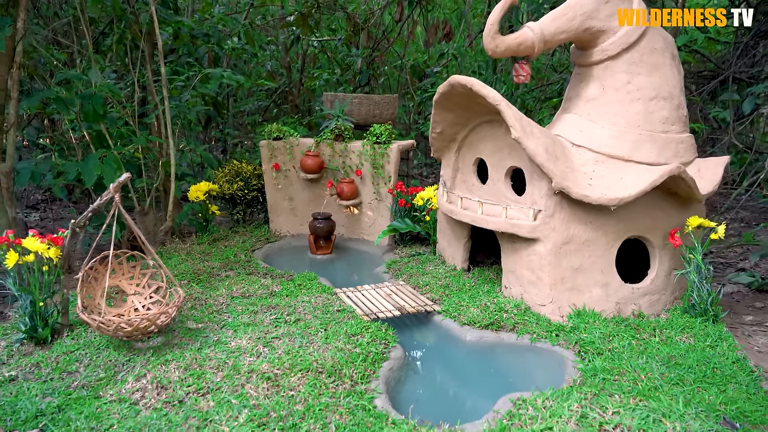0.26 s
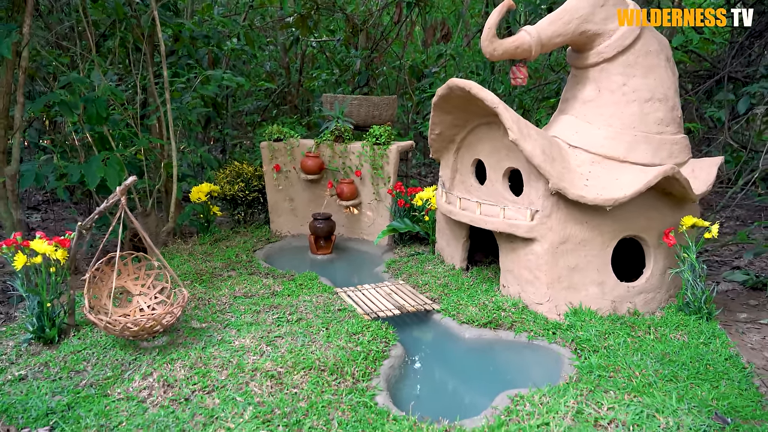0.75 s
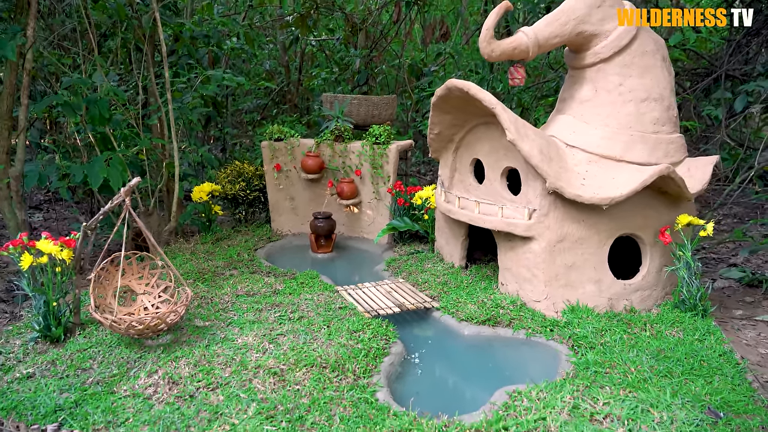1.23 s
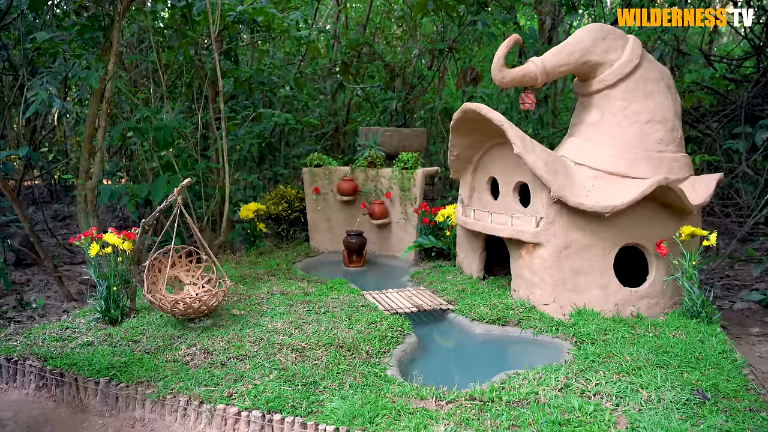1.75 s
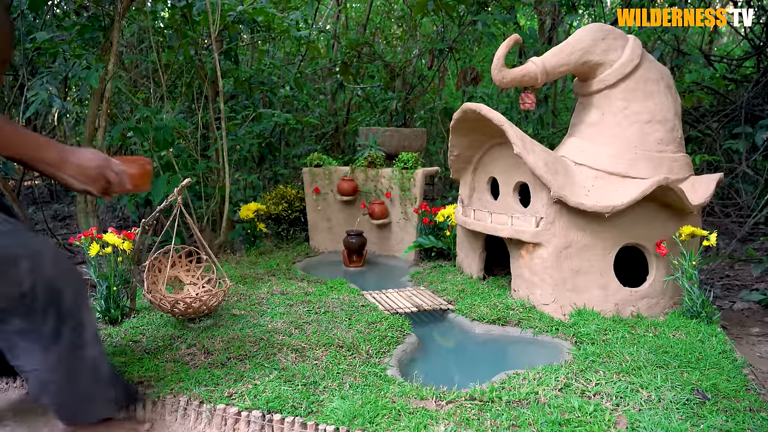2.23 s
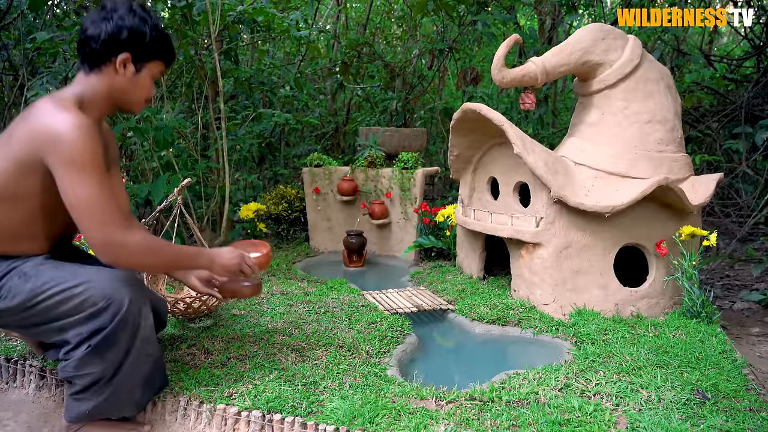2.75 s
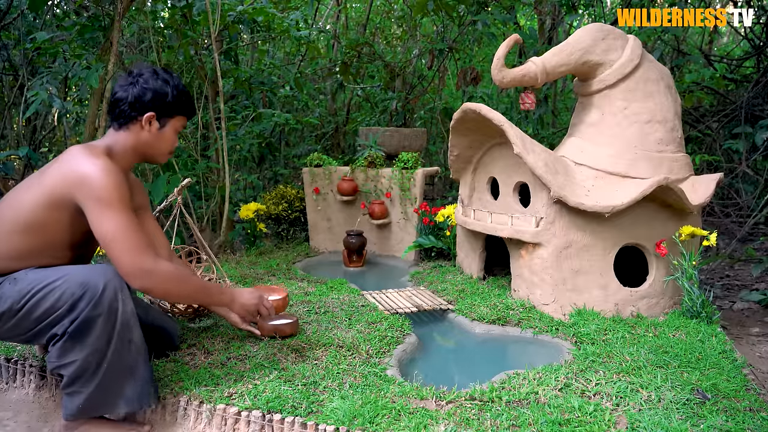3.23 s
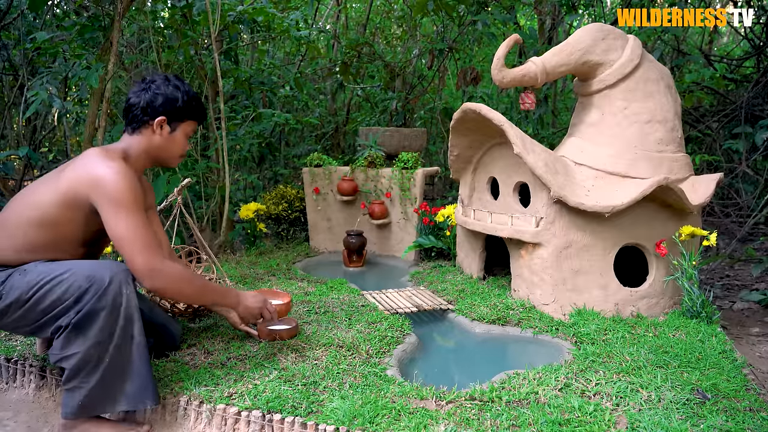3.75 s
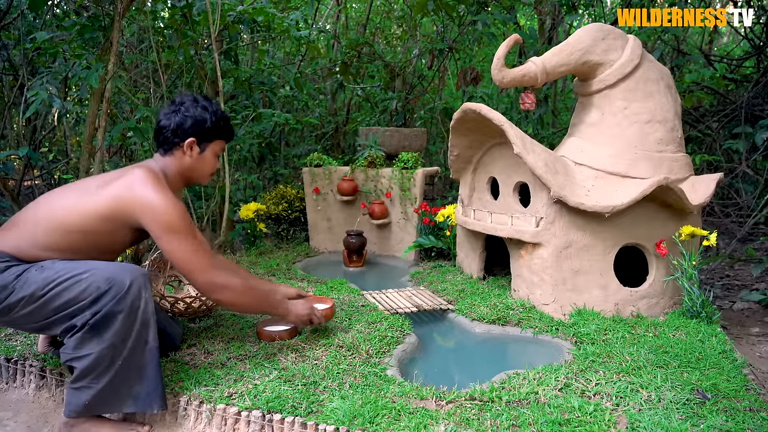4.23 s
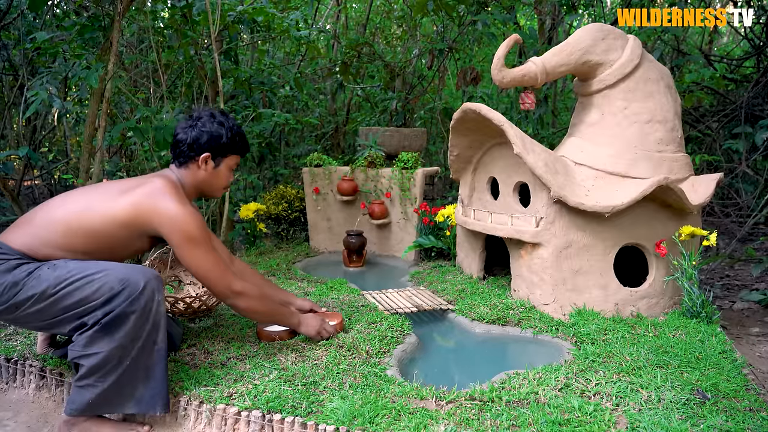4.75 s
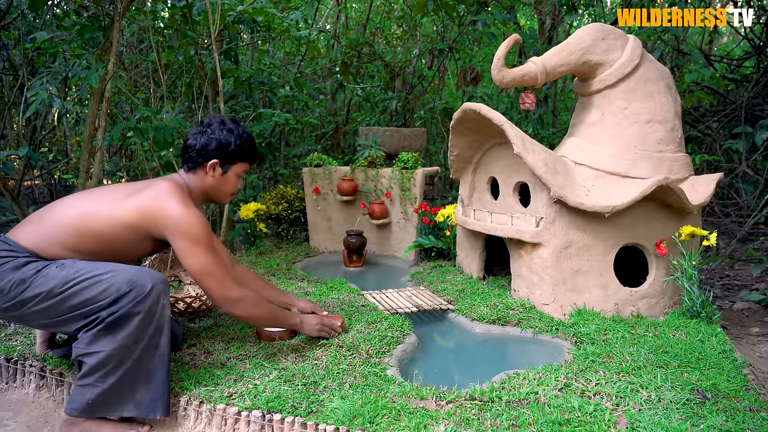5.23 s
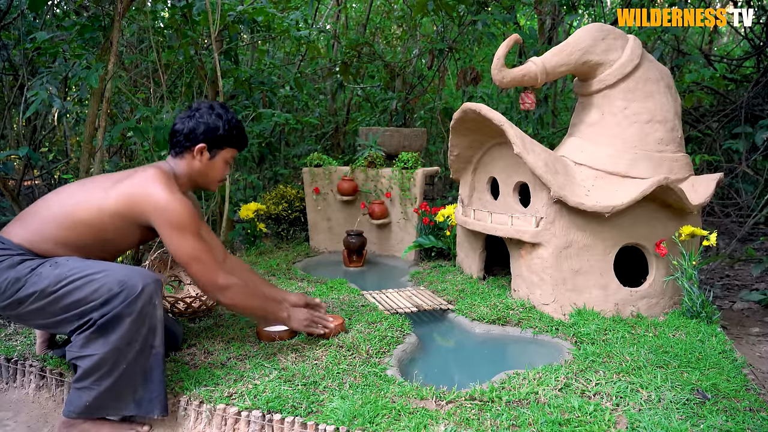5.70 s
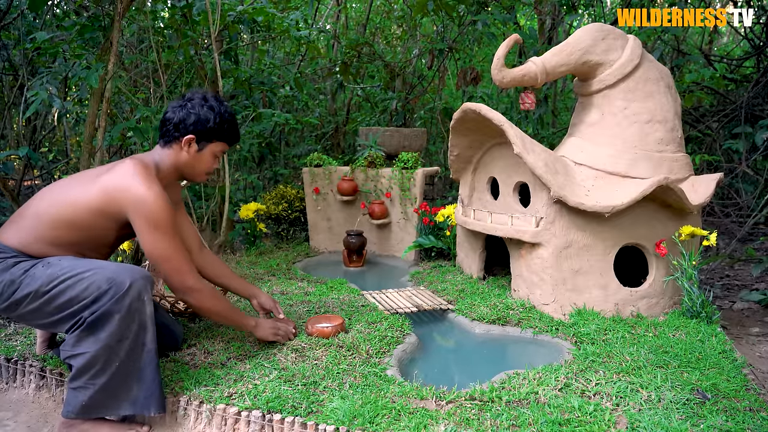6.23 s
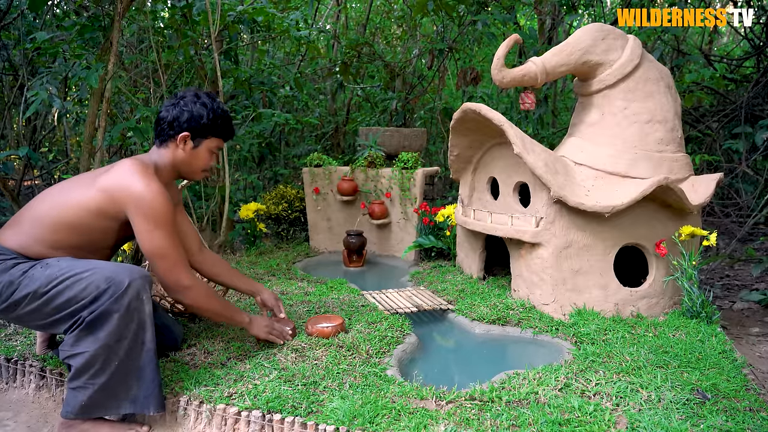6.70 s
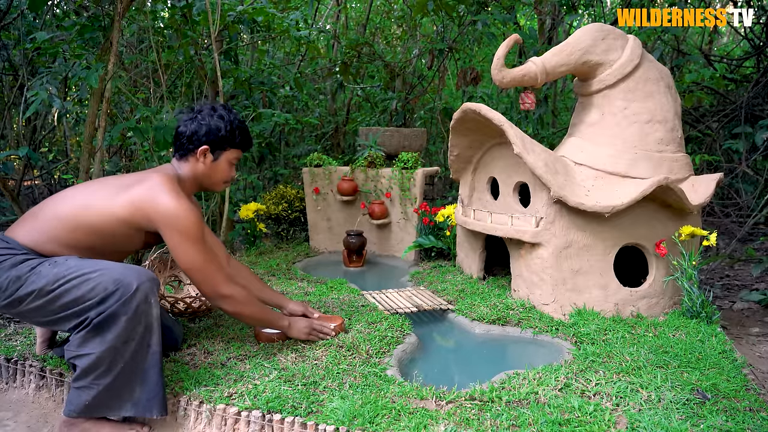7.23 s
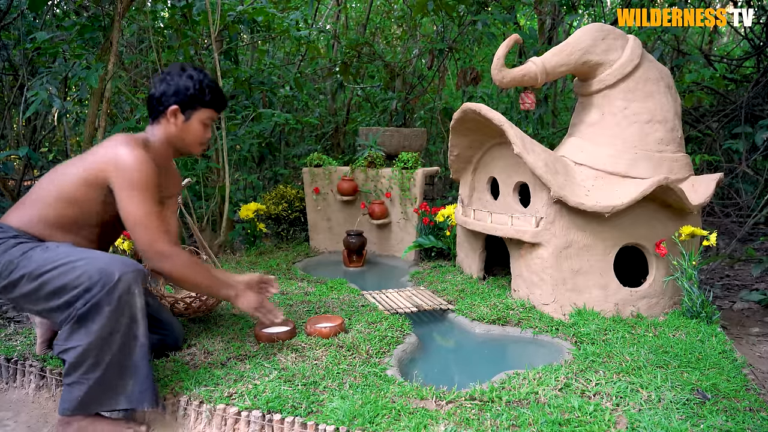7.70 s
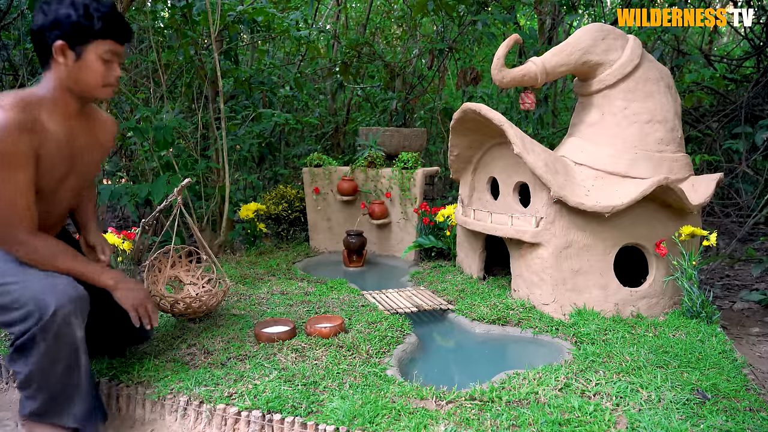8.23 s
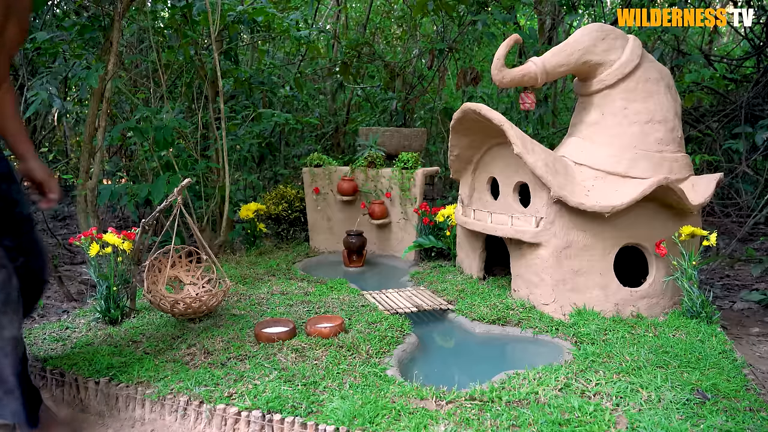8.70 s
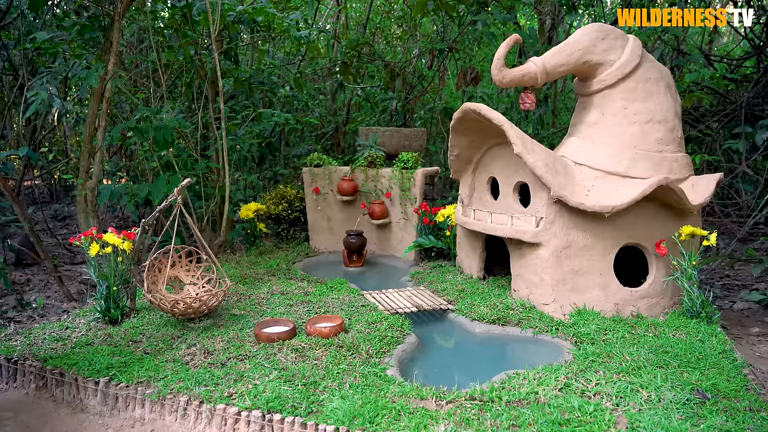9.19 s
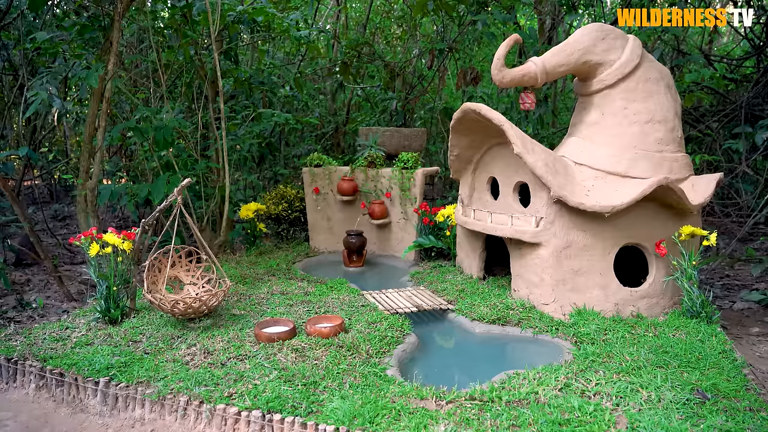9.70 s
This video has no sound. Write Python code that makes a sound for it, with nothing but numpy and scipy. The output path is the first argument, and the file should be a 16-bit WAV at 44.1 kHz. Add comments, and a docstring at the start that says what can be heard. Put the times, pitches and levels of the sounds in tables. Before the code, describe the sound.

Thin streams of water gurgle and plink into a clay pot and shallow pond outdoors, with faint birds and a distant engine swelling.

```python
"""Garden fountain and clay pot

Thin streams of water fall from a garden fountain into a clay pot and a shallow pond.
Trapped air gulps and gurgles as ringing tones; small bubbles plink and short bursts of noise patter.
Far birds whistle in gliding tones, over a hiss of filtered noise and a distant engine of steady
tones and rumble that grows for most of the scene."""
import sys
import numpy as np
from scipy import signal
from scipy.fft import rfft, irfft, next_fast_len
from scipy.io import wavfile
from scipy.ndimage import map_coordinates

SR = 44100
rng = np.random.default_rng(int(sys.argv[2]) if len(sys.argv) > 2 else 0)


def dump_mix(stems):
    """Bounce the given channels to the path in sys.argv[1] as a 16-bit WAV at rate SR."""
    frames = np.atleast_2d(stems).T  # one column per channel
    limited = np.clip(frames, -1, 1)  # hard clip at full scale
    pcm = np.round(limited * 32767).astype(np.int16)
    wavfile.write(sys.argv[1], SR, pcm)


N = 438794  # samples in the scene

# The larger bubbles in the pot, before trims of level and pitch bends:
# [t/s, peak level/dB, f/Hz, life/s]
LARGE_BUBBLES = [(0.033, -31.5, 727, 0.0029), (0.193, -36.5, 760, 0.017), (0.2566, -31.5, 678, 0.014),
                 (0.3394, -31.5, 753, 0.0092), (0.4321, -29.5, 764, 0.011), (0.6035, -29, 880, 0.0087),
                 (0.617, -32, 930, 0.005), (0.742, -37.5, 520, 0.0075), (0.7724, -33, 809, 0.0045),
                 (0.83, -32, 688, 0.01), (0.8623, -29.5, 734, 0.0073), (0.955, -35, 751, 0.01),
                 (0.9865, -20, 744, 0.006), (1.0408, -29.5, 734, 0.0086), (1.311, -25, 746, 0.006),
                 (1.49, -34.5, 662, 0.017), (1.5235, -34, 1224, 0.0073), (1.548, -30, 477, 0.0088),
                 (1.5803, -35, 525, 0.0085), (1.684, -26, 702, 0.0066), (1.758, -30.5, 748, 0.013),
                 (1.78, -30.5, 1090, 0.0041), (1.8909, -31, 755, 0.014), (2.032, -34, 490, 0.015),
                 (2.111, -33, 813, 0.006), (2.16, -36, 757, 0.009), (2.2, -25, 753, 0.011),
                 (2.219, -26.5, 930, 0.0064), (2.3245, -33, 760, 0.0033), (2.34, -34, 750, 0.022),
                 (2.4545, -20.5, 910, 0.0092), (2.512, -31.5, 750, 0.006), (2.778, -38, 934, 0.01),
                 (2.832, -28.5, 638, 0.0045), (2.978, -27, 1250, 0.0078), (2.9996, -31.5, 645, 0.0069),
                 (3.055, -37, 695, 0.0089), (3.121, -33.5, 824, 0.0028), (3.217, -38.5, 538, 0.01),
                 (3.239, -32.5, 549, 0.011), (3.294, -34.5, 1283, 0.011), (3.4635, -33, 608, 0.0075),
                 (3.58, -36, 743, 0.022), (3.6515, -32.5, 767, 0.021), (3.744, -40, 524, 0.017),
                 (3.789, -33.5, 784, 0.015), (3.837, -32, 770, 0.017), (3.865, -27.0, 770, 0.014),
                 (3.9056, -33.5, 727, 0.0079), (3.999, -32.5, 726, 0.012), (4.077, -33.5, 706, 0.012),
                 (4.124, -28.5, 730, 0.01), (4.274, -25.5, 627, 0.0067), (4.375, -33, 690, 0.0071),
                 (4.593, -34, 980, 0.0081), (4.697, -33.5, 1020, 0.006), (4.778, -34, 589, 0.016),
                 (5.0032, -32, 586, 0.012), (5.122, -29.5, 652, 0.005), (5.1825, -38, 503, 0.011),
                 (5.215, -31.5, 570, 0.0068), (5.2576, -37, 660, 0.0082), (5.4254, -25.5, 723, 0.0059),
                 (5.5896, -27, 686, 0.0057), (5.616, -33, 743, 0.019), (5.657, -32.5, 840, 0.004),
                 (5.68, -35, 1014, 0.0077), (5.7008, -34.5, 793, 0.017), (5.719, -34.5, 723, 0.0075),
                 (5.755, -31, 655, 0.0056), (5.8855, -27.5, 626, 0.0093), (5.901, -30, 640, 0.007),
                 (6.096, -30, 698, 0.0055), (6.11, -37, 900, 0.014), (6.275, -32.5, 600, 0.01),
                 (6.325, -28, 661, 0.0094), (6.3433, -37, 690, 0.0095), (6.377, -29.5, 614, 0.012),
                 (6.5485, -31.5, 784, 0.018), (6.6127, -25.5, 745, 0.01), (6.6369, -31, 690, 0.0073),
                 (6.691, -36.5, 656, 0.019), (6.7597, -30.5, 696, 0.0087), (6.877, -23, 784, 0.011),
                 (6.897, -34.5, 778, 0.025), (6.928, -29, 728, 0.0093), (7.0696, -28, 682, 0.0053),
                 (7.092, -32.5, 575, 0.014), (7.116, -36.5, 777, 0.012), (7.246, -39, 597, 0.013),
                 (7.446, -37, 628, 0.014), (7.524, -30.5, 684, 0.0058), (7.592, -30, 636, 0.0089),
                 (7.675, -38, 593, 0.015), (7.705, -38.5, 682, 0.017), (7.7475, -30, 710, 0.0073),
                 (7.796, -28, 660, 0.0062), (7.863, -35.0, 653, 0.012), (7.959, -33.5, 754, 0.009),
                 (7.982, -29.5, 1043, 0.011), (8.285, -26, 755, 0.0087), (8.325, -29.5, 776, 0.011),
                 (8.36, -36, 766, 0.016), (8.408, -34.5, 620, 0.014), (8.6337, -30, 700, 0.0044),
                 (8.689, -34, 590, 0.0095), (8.733, -34, 587, 0.016), (8.7475, -34, 590, 0.022),
                 (9.0622, -19, 777, 0.0089), (9.08, -35, 740, 0.015), (9.171, -36.5, 567, 0.011),
                 (9.199, -36.5, 940, 0.012), (9.2907, -27.5, 706, 0.0049), (9.3724, -27, 690, 0.0099),
                 (9.517, -34, 596, 0.011), (9.565, -37, 620, 0.012), (9.7066, -29, 794, 0.013),
                 (9.784, -30, 707, 0.008)]
# Tone colour of the spray, relative: [f/Hz, level/dB]
SPRAY_COLOUR = [(500, -27), (1500, 8), (2700, -8.5), (4000, -2.5), (7000, 4), (9000, -0.5), (12000, -4),
                (16000, 0.5)]


def amp(db):
    """Turn decibels into a gain."""
    return 10 ** (np.asarray(db) / 20)


def unit(x):
    """Scale to an average strength (rms) of 1."""
    return x / np.sqrt(np.mean(x ** 2) + 1e-20)


def along(points, hz):
    """Read a table of (frequency, value) at any frequency, on a log axis."""
    f, v = np.transpose(points)
    return np.interp(np.log(hz + 1), np.log(f + 1), v)


def curves(rows):
    """Draw one value per sample for each column after the time."""
    s, *columns = np.transpose(rows)
    t = np.arange(N) / SR
    return [np.interp(t, s, column) for column in columns]


def wobble(rate):
    """A smooth random curve through rate random points a second."""
    points = rng.standard_normal(int(N * rate / SR) + 4)
    return map_coordinates(points, [np.arange(N) * rate / SR])


def filtered(x, response):
    """Make each frequency of x louder or softer by response(frequency)."""
    m = next_fast_len(N + SR // 2)
    hz = np.fft.rfftfreq(m, 1 / SR)
    return irfft(rfft(x, m) * response(hz), m)[..., :N]


def stereo_shares(hz):
    """Gains of the shared and the opposed part: near mono in the bass, wide in the treble."""
    # How alike left and right are: [f/Hz, likeness (1 = the same)]
    likeness = [(100, 1), (600, 0.85), (1200, 0.45), (2500, 0.28), (5000, 0.42), (9000, 0.017)]
    turn = np.arccos(np.clip(along(likeness, hz), -1, 1)) / 2
    return np.array([np.cos(turn), np.sin(turn)])


def noise(spectrum):
    """Stereo noise with the given tone colour, scaled to rms 1."""
    def response(hz):
        return amp(along(spectrum, hz)) * stereo_shares(hz)

    mid, side = filtered(rng.standard_normal((2, N)), response)
    return unit(np.array([mid + side, mid - side]))


def echo(x, decay, size, count):
    """Blurred echoes: noise tails in which each frequency dies at its own speed.
    The scene is cut into count stretches, each with its own random tail, as the sources move."""
    hz, t, z = signal.stft(rng.standard_normal((count, 2, size)), SR, nperseg=128)
    fade = amp(-60 * t / along(decay, hz)[:, None])
    z = z * fade * stereo_shares(hz)[:, :, None]
    tails = signal.istft(z, SR, nperseg=128)[1]
    out, hop = np.zeros((2, 2 * N)), N // count + 1
    for k, (mid, side) in enumerate(tails):
        late = np.arange(len(mid)) > SR // 1500  # a short silence before the echo
        tail = np.array([mid + side, mid - side]) * late
        stretch = x[:, k * hop:(k + 1) * hop]
        wet = signal.fftconvolve(stretch, tail / np.linalg.norm(tail[0]), axes=1)
        out[:, k * hop:][:, :wet.shape[1]] += wet
    return out[:, :N]


def bubbles(s, db, hz, life, glide, hold, spread, size, sag=0, linger=0):
    """Stereo sum of bubbles, each a short tone of bending pitch from trapped air.
    glide: pitch rise per life; hold > 1 delays the decay; sag: how far above its pitch
    a bubble starts; linger: share that rings on; spread: left-right unlikeness."""
    t = np.arange(size) / SR
    chance = rng.standard_normal((len(s), 3))
    hz, age = hz[:, None], t / life[:, None]
    # the pitch settles as the bubble pinches off, then on average rises as it nears the surface
    settling = sag * np.exp(-hz * t / 0.6)
    rising = glide * (1 + chance[:, :1]) * (np.minimum(age, 3) - .5)
    phase = 2 * np.pi * np.cumsum(hz * (1 + settling + rising), axis=1) / SR
    onset = 1 - np.exp(-(1.01 * hz * t) ** 2)
    decay = np.exp(-age ** hold) + linger * np.exp(-t / 0.015)
    shape = onset * decay * (1 - (t / t[-1]) ** 4)  # the last factor ends in silence
    shape *= amp(db)[:, None] / (shape.max(axis=1, keepdims=True) + 1e-9)
    # short waves arrive left and right with unlike phase and strength
    apart = spread * np.minimum(hz / 7000, 1.3) ** 0.91
    starts = np.maximum(s * SR, 0).astype(int)
    index = (starts[:, None] + np.arange(size)).ravel()
    channels = []
    for side in (1, -1):
        strength = amp(side * apart * chance[:, 1:2])
        wave = shape * strength * np.sin(phase + side * apart * chance[:, 2:])
        channels.append(np.bincount(index, wave.ravel(), N)[:N])
    return np.array(channels)


def swarm(impacts, count, delay, low_hz, high_hz, cycles, scatter_db, size):
    """Every impact leaves count bubbles of random pitch and strength soon after it; rms 1."""
    s, force_db = np.repeat(impacts, count, axis=0).T
    pitch, strength, length, wait = rng.random((len(s), 4)).T
    hz = np.minimum(low_hz * (high_hz / low_hz) ** pitch, SR / 2.5)
    life = cycles * 2 ** (2 * length - 1) / hz  # from half to twice the usual cycles
    db = force_db + scatter_db * strength ** 2
    s = s - delay * np.log(1 - wait)
    return unit(bubbles(s, db, hz, life, glide=.02, hold=1.4, spread=.9, size=size))


def moments(count):
    """Random times over the whole scene."""
    return rng.uniform(0, N / SR, count)


def landings(count, scatter_db):
    """Lumps of water landing at random with uneven force: (time in s, force in dB)."""
    return np.column_stack([moments(count), scatter_db * rng.random(count) ** 2])


def staggered(count):
    """Times at which a stream breaks into lumps: one at random in each of count equal slots."""
    return (np.arange(count) + rng.random(count)) / count * (N - 1) / SR


def splashes(s, db, fade, spectrum):
    """A burst of noise at each time, dying away with the time constant fade in seconds."""
    entries = np.bincount((s * SR).astype(int), amp(db), N)[:N]
    burst = np.exp(-np.arange(SR // 30) / SR / fade)
    return signal.fftconvolve(entries, burst)[:N] * noise(spectrum)


def wash():
    """The soft hiss of water and leaves: coloured noise that wavers in level."""
    # Relative tone colour: [f/Hz, level/dB]
    hiss_colour = [(200, -37), (350, -8.5), (450, -12), (700, -14), (1100, -1), (1800, -5), (2700, -2),
                   (3800, -3), (6500, -3), (9000, -6), (16000, -11.5)]
    return amp(-55 + 1.76 * wobble(12)) * noise(hiss_colour)


def engine():
    """A far engine: tones at multiples of a wandering turning rate, within low noise."""
    # Rise and fall of the engine, before the rumble's trim: [t/s, hum level/dB, rumble level/dB]
    engine_course = [(0, -79, -73), (1.5, -78, -73.5), (2.5, -74, -72), (4.5, -70.5, -71), (5.5, -68, -70),
                     (7.5, -69.5, -70.5), (8.2, -66.5, -71), (9, -66, -68.5), (9.95, -72, -65.5)]
    # Relative tone colour of the rumble: [f/Hz, level/dB]
    rumble_colour = [(20, -28), (40, -18), (70, -15), (100, -3.5), (150, -2), (200, -5.5), (260, -3.5),
                     (350, -11.5), (600, -44), (1200, -56)]
    # Relative strength of the tones: [multiple of the turning rate, level/dB]
    engine_tones = [(4, -19), (5, -8), (6, -2), (7, -5), (8, -9), (9, -11.5), (10, -11), (11, -18.5)]
    turning_hz, rumble_trim_db = 25.22, 0.5
    hum_db, rumble_db = curves(engine_course)
    turns = np.cumsum(turning_hz * (1 + 0.00608 * wobble(2))) / SR
    hum = 0
    for order, db in engine_tones:
        tone = np.sin(2 * np.pi * (order * turns + rng.random()))
        hum = hum + amp(db + 1.7 * wobble(3)) * tone
    return amp(rumble_db + rumble_trim_db) * noise(rumble_colour) + amp(hum_db) * unit(hum)


def birds():
    """Gliding whistles, some raspy, fluttering in strength and smeared by the trees."""
    # Far whistles, before flutter and mixing:
    # [t/s, length/s, start f/Hz, middle f/Hz, end f/Hz, level/dB, rasp (share of pitch)]
    whistles = [(.105, .21, 4110, 4130, 4020, -52, .011), (.298, .05, 4000, 3700, 3300, -52, .008),
                (.328, .09, 3300, 3180, 3230, -54, .01), (.51, .05, 5200, 5350, 5550, -56.5, .016),
                (.555, .11, 5620, 5640, 5620, -52.5, .014), (.70, .09, 2950, 2820, 2860, -54.5, .055),
                (.92, .11, 2900, 2680, 2580, -54.5, .06), (6.62, .18, 6100, 6380, 6450, -53.5, .022),
                (6.85, .22, 2790, 2840, 2940, -54, .022), (7.11, .15, 3475, 3460, 3445, -49, .007),
                (7.255, .095, 3410, 3450, 3420, -55.5, .012), (7.33, .05, 3420, 3230, 2780, -50.5, .008),
                (7.99, .52, 5900, 6200, 6300, -56.5, .06), (8.95, .11, 3600, 3780, 3740, -56, .03),
                (9.20, .12, 3600, 3510, 3480, -55, .022), (9.37, .11, 3620, 3400, 3330, -60, .035)]
    # Time for the forest's echo to fall 60 dB: [f/Hz, time/s]
    forest_decay = [(500, 0.83), (3000, 0.7), (7000, 0.75)]
    song, waver = np.zeros(N + SR), wobble(260)
    for s, length, start_hz, middle_hz, end_hz, db, rasp in whistles:
        u = np.linspace(0, 1, int(length * SR))
        first = int(s * SR)
        hz = np.interp(u, [0, .5, 1], [start_hz, middle_hz, end_hz])
        hz *= 1 + rasp * waver[first:][:len(u)]
        tone = np.sin(2 * np.pi * np.cumsum(hz) / SR)
        song[first:][:len(u)] += amp(db) * signal.windows.tukey(len(u), .3) * tone
    song = np.array([song[:N], song[:N]]) * amp(2 * wobble(35))
    return amp(1.5) * song + amp(4.5) * echo(song, forest_decay, size=SR, count=1)


def yard(x):
    """The yard returns short echoes of the water."""
    # Time for the yard's echo to fall 60 dB: [f/Hz, time/s]
    yard_decay = [(300, 0.099), (1000, 0.08), (4000, 0.059), (14000, 0.046)]
    return echo(x, yard_decay, size=SR // 5, count=30)


def clay_walls(x):
    """The pot and the wall behind it scatter the treble within a few milliseconds."""
    # Time for the scattered sound to fall 60 dB: [f/Hz, time/s]
    clay_decay = [(1000, 0.044), (12000, 0.021)]
    treble = filtered(x, lambda hz: hz ** 2 / (hz ** 2 + 2200 ** 2))
    return echo(treble, clay_decay, size=1024, count=120)


def pot(x):
    """The air in the clay pot rings at its own pitches, like breath over a jar."""
    # Air resonances of the pot: [f/Hz, width/Hz, level/dB]
    resonances = [(631, 23, 4), (729, 69, 4.5), (1260, 240, -16.5), (2166, 44, 6.5), (2660, 173, 1.5)]

    def response(f):
        return sum(amp(db) * 1j * f * width / (centre * centre - f * f + 1j * f * width)
                   for centre, width, db in resonances)

    return filtered(x, response)


def spray(impacts):
    """Each impact throws a cluster of droplets that land as ticks and fizz; separate ones smack sharply."""
    # Relative tone colour of the smacks: [f/Hz, level/dB]
    smack_colour = [(1500, -8), (3000, -14), (6000, -1), (10000, -2.5), (16000, -7)]

    def coloured(x):
        return unit(filtered(x, lambda hz: amp(along(SPRAY_COLOUR, hz))))

    fizz = swarm(impacts, count=3, delay=.003, low_hz=2342, high_hz=14800,
                 cycles=8.1, scatter_db=9.0, size=300)
    ticks = swarm(impacts, count=7, delay=.003, low_hz=2650, high_hz=13500,
                  cycles=0.73, scatter_db=22.0, size=80)
    s, force_db = landings(count=330, scatter_db=16).T
    smacks = unit(splashes(s, force_db, fade=0.0033, spectrum=smack_colour))
    return amp(7.5) * coloured(fizz) + amp(0.5) * coloured(ticks) + amp(4.0) * smacks


def plinks():
    """Single drops smack the water, trap tiny bubbles that ring briefly, and stir the pot."""
    # The sharpest drops on the pond, before trims and pitch bends: [t/s, peak level/dB, f/Hz]
    sharp_drops = [(0.0868, -27.5, 6550), (0.1717, -33, 5100), (0.191, -27.5, 5060), (0.336, -33.5, 3340),
                   (0.4316, -21, 5120), (0.6, -22, 5650), (0.712, -32, 3220), (1.2596, -20.5, 7300),
                   (1.272, -25.5, 5200), (1.386, -32, 5510), (1.5818, -29.5, 7740), (1.6262, -31.5, 5460),
                   (1.737, -29, 4160), (1.7998, -27.5, 7300), (2.16, -32.5, 3360), (2.4877, -31, 7300),
                   (2.58, -32, 4500), (2.6763, -30, 5000), (2.7565, -23.5, 4400), (2.9373, -33.5, 2500),
                   (3.0574, -25, 7640), (3.1378, -37, 3100), (3.3872, -31.5, 5640), (3.5293, -32, 4400),
                   (3.8154, -27.5, 3520), (3.9562, -30, 4980), (4.0004, -31, 6550), (4.0632, -31, 3210),
                   (4.158, -31, 7840), (4.3038, -29, 3240), (4.3887, -31, 4700), (4.8735, -32, 6500),
                   (4.9184, -33.5, 6630), (5.1013, -30, 3340), (5.1817, -29, 9600), (5.2417, -27.5, 6600),
                   (5.2817, -30, 7300), (5.3455, -30, 6360), (5.6506, -30, 5040), (5.6992, -25, 6640),
                   (5.822, -32, 2620), (6.0164, -27.5, 9500), (6.0492, -29, 5650), (6.3121, -38, 2750),
                   (6.559, -31.5, 5150), (6.8737, -31, 2860), (6.9532, -29, 2800), (6.974, -32, 2850),
                   (6.999, -27.5, 3940), (8.2427, -19.5, 6020), (8.8134, -31.5, 7600), (8.9153, -30, 2570),
                   (8.981, -31.5, 3750), (9.431, -31, 7560), (9.5452, -26.5, 9900), (9.7166, -26, 6700),
                   (9.7482, -29, 2650)]
    s, db, hz = np.transpose(sharp_drops)
    life = 5.8 / hz  # a bubble lasts about this many cycles of its pitch
    ring = bubbles(s, db - 0.5, hz, life, glide=.025, hold=1.3, spread=.6, size=500, linger=.05)
    splash = splashes(s, db, fade=0.0017, spectrum=SPRAY_COLOUR)
    return ring + amp(-9.5) * splash + amp(1) * pot(splash)


def churn(impacts, ringing_db, small_db):
    """A mesh of lesser bubbles tumbles in and around the pot, and the patter keeps its air ringing."""
    tumbling = landings(count=1100, scatter_db=12.5)
    low = swarm(tumbling, count=1, delay=0.003, low_hz=550.7, high_hz=1165,
                cycles=6.4, scatter_db=12.5, size=1400)
    middle = swarm(tumbling, count=4, delay=.008, low_hz=974, high_hz=3367,
                   cycles=9.8, scatter_db=13.5, size=850)
    patter = swarm(impacts, count=3, delay=.003, low_hz=752, high_hz=3740,
                   cycles=0.76, scatter_db=14, size=150)
    ringing = unit(pot(patter + .5 * patter[::-1]))  # each side hears some of the other
    return amp(-53) * low + amp(small_db) * middle + amp(ringing_db) * ringing


def gurgle():
    """Each lump of the stream traps a lesser bubble near the gurgle's pitch; rows like LARGE_BUBBLES."""
    # Path of the gurgle as the pocket of air under the stream swells and shrinks,
    # before the shifts and scatter below: [t/s, f/Hz, level/dB]
    gurgle_course = [(0.0, 760, -45), (0.29, 740, -41), (0.58, 870, -62), (0.81, 803, -40.5),
                     (1.1, 720, -43.5), (1.63, 662, -41.5), (1.97, 764, -45), (2.09, 760, -37),
                     (2.9, 561, -50), (3.6, 750, -38.5), (4.59, 687, -55), (5.22, 569, -39.5),
                     (5.401, 682, -44), (5.63, 742, -40), (5.921, 693, -51), (6.33, 595, -38),
                     (6.439, 670, -58), (6.91, 736, -39.5), (7.08, 648, -46), (8.65, 688, -43.5),
                     (9.061, 717, -49.5), (9.95, 700, -40.5)]
    peak_db, scatter_db = -1, 3.5  # a bubble's peak over the path; its spread
    settle_octaves, scatter_octaves = 0.06, .11  # shift below the path's pitch; its spread
    life_s, life_octaves = 0.013, 0.49  # usual life of a bubble; its spread
    gap_s = 0.012  # no lesser bubble forms this near a large one
    s = staggered(count=260)
    knots, pitch_hz, level_db = np.transpose(gurgle_course)
    strength, pitch, life = np.clip(rng.standard_normal((len(s), 3)), -2, 2).T
    db = np.interp(s, knots, level_db) + peak_db + scatter_db * strength
    hz = np.interp(s, knots, pitch_hz) * 2 ** (scatter_octaves * pitch - settle_octaves)
    rows = np.column_stack([s, db, hz, life_s * 2 ** (life_octaves * life)])
    distance_s = np.abs(s[:, None] - np.array(LARGE_BUBBLES)[:, 0]).min(axis=1)
    return rows[distance_s > gap_s]


def gulps():
    """The stream drags bubbles under; each tears off a smaller twin, splashes a little and rings the pot."""
    s, db, hz, life = np.vstack([LARGE_BUBBLES, gurgle()]).T
    ring = bubbles(s, db - .5, hz, life, glide=0.053, hold=3.8, spread=0.75, size=2200,
                   sag=0.71, linger=0.32)
    # a twin is about half an octave higher, softer and shorter
    twin_hz = hz * 2 ** (0.532 + 0.212 * rng.standard_normal(len(s)))
    twins = bubbles(s, db - 12.5, twin_hz, 0.65 * life, glide=0.052, hold=2.1, spread=0.9, size=1200)
    splash = splashes(s, db, fade=0.0022, spectrum=SPRAY_COLOUR)
    return ring + twins + amp(-26.0) * splash + amp(-3) * pot(splash)


def scene():
    """The fountain ahead, its spray slightly to the right, the forest around."""
    # The fall of water, as levels before mixing:
    # [t/s, spray level/dB, pot ringing level/dB, small bubbles level/dB]
    flow = [(0, -59.5, -52.5, -57.5), (1, -63, -65, -55), (1.7, -60, -55, -52.5), (2.3, -61.5, -64, -52.5),
            (3.2, -61, -53.5, -52), (3.85, -59.5, -54, -53.5), (4.7, -61, -59, -52.5),
            (5.6, -60, -50.5, -53), (6.5, -60.5, -52.5, -54), (7.5, -61, -52, -56),
            (8.3, -60.5, -52.5, -52), (9, -61.5, -54.5, -52.5), (9.9, -62, -53, -56)]
    spray_db, ringing_db, small_db = curves(flow)
    impacts = landings(count=1000, scatter_db=11)
    drops = (plinks() + amp(spray_db) * spray(impacts)) * amp([[-1], [1]])  # to the right
    tumble = churn(impacts, ringing_db, small_db) * amp([[.5], [-.5]])  # a little to the left
    water = gulps() + tumble + drops
    water = water + amp(-6.0) * clay_walls(water) + amp(-9.0) * yard(water)
    # so small a body of water radiates almost no bass
    water = filtered(water, lambda hz: 1 / np.sqrt(1 + (420 / (hz + 1)) ** 8))
    return water + birds() + wash() + engine()


def record(dry):
    """Remove everything from the top frequency limit upward."""
    top_hz = 16100
    return filtered(dry, lambda hz: hz < top_hz)


dry = scene()
out = record(dry)
dump_mix(out)
```